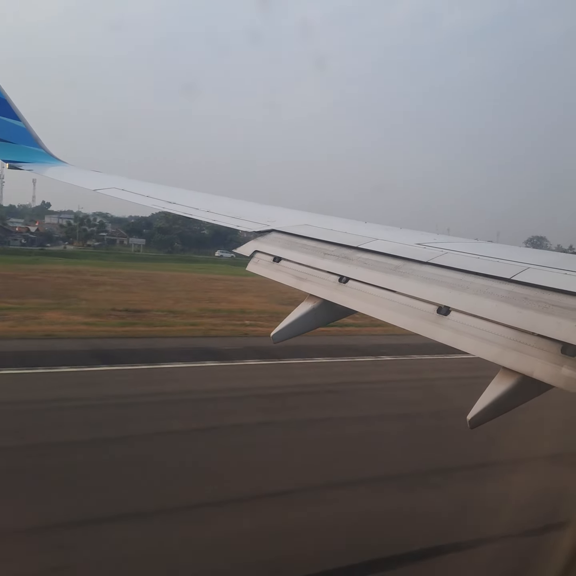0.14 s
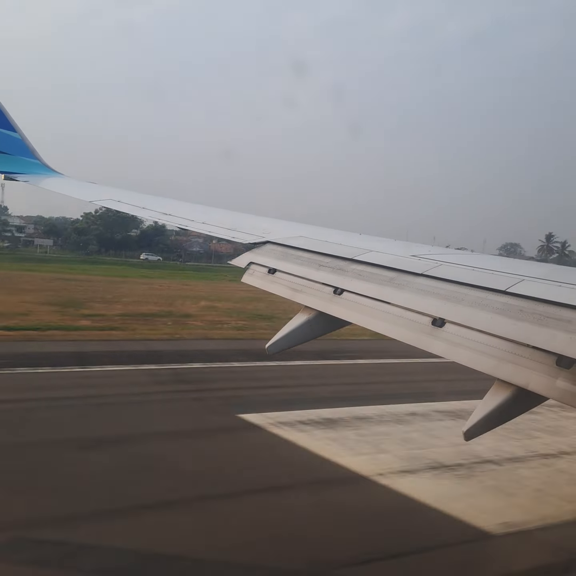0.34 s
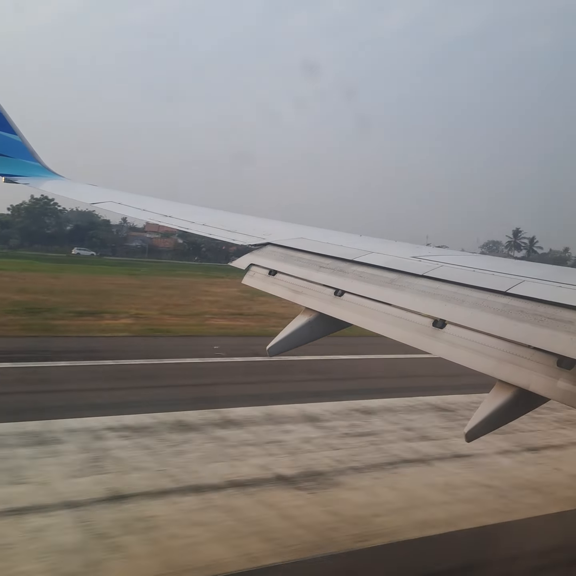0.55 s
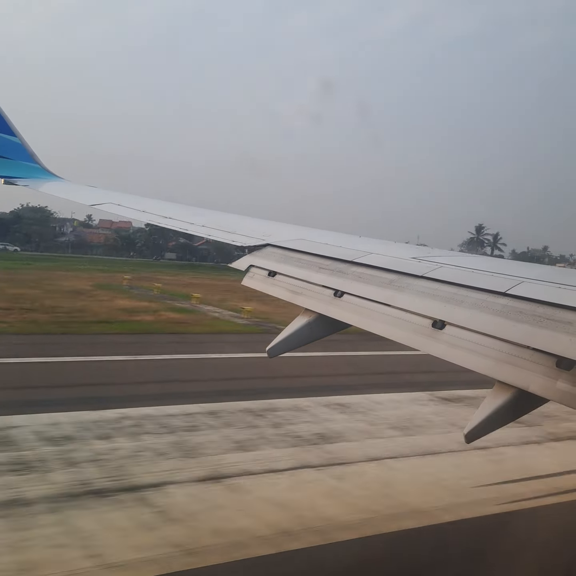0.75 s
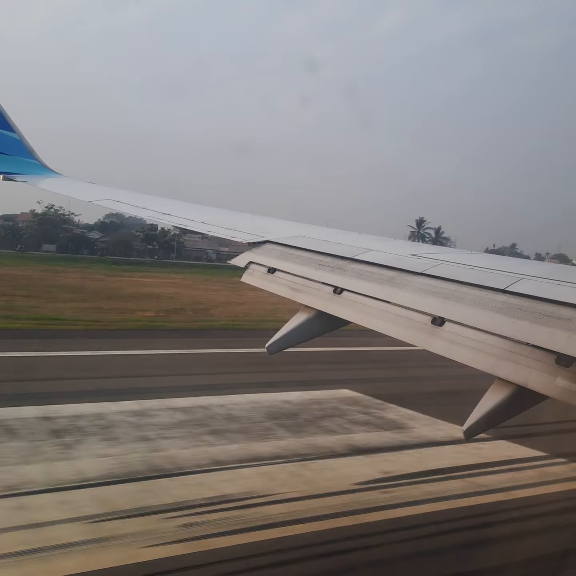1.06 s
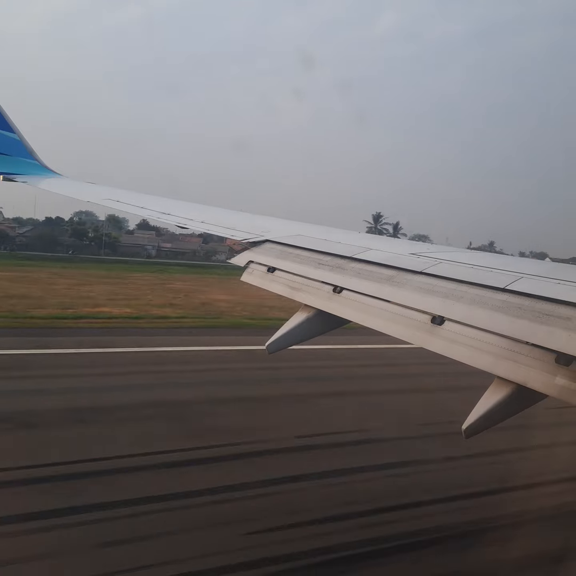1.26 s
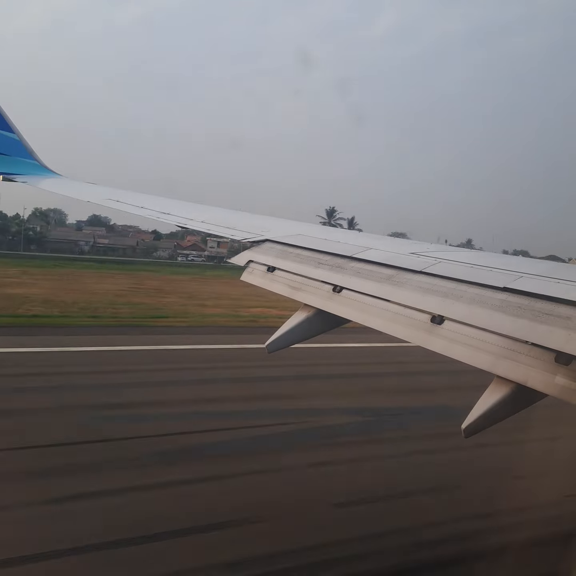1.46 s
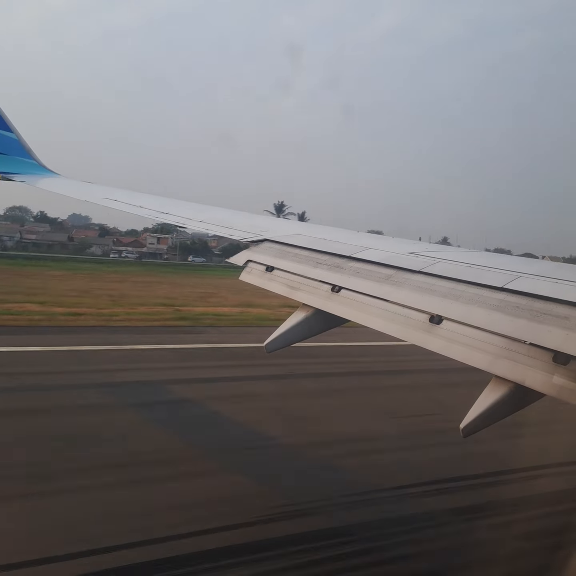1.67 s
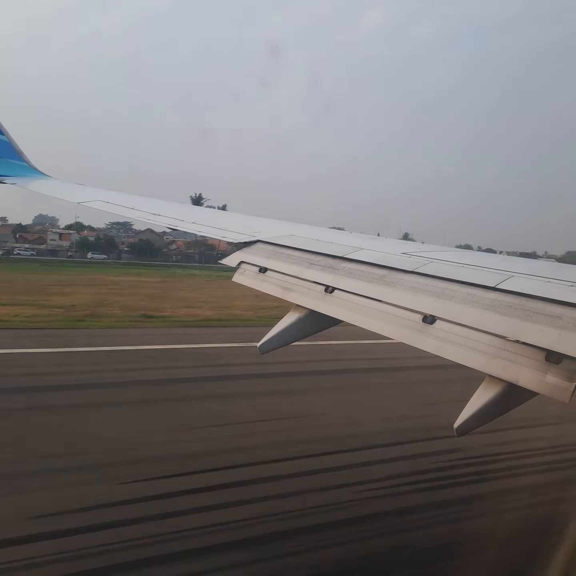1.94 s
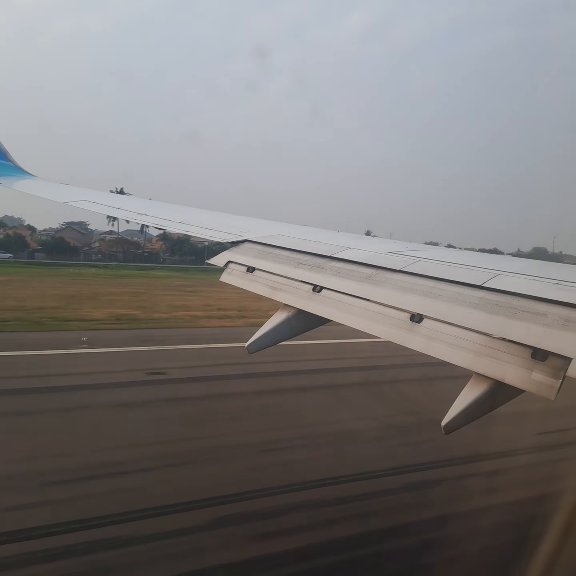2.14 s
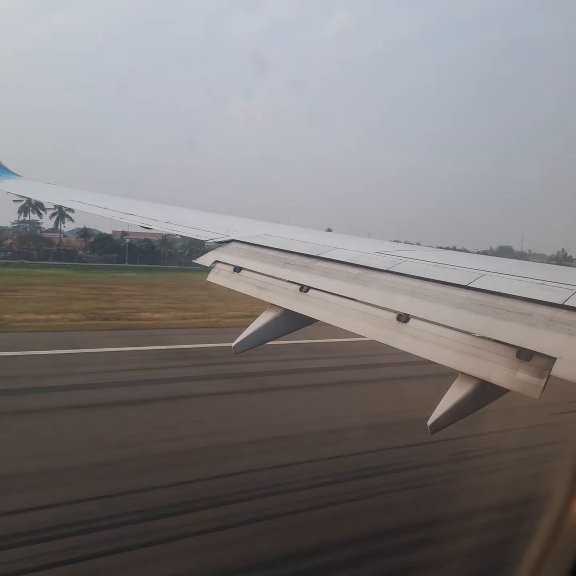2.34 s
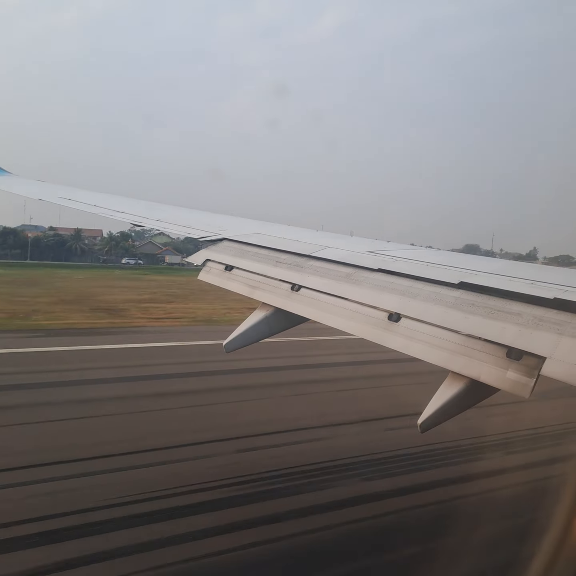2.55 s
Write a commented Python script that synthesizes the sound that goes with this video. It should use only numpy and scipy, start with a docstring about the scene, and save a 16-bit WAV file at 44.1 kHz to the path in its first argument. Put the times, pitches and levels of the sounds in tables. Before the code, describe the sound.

Deep cabin rumble of an airliner rolling fast on a runway, fittings knocking lightly.

```python
"""Window seat on the runway

An airliner rolls fast along a runway, heard from inside. The wheels shake the fuselage into a deep
boom and rumble; air and engines roar behind the wall, with a narrow fan whine near 2 kHz.
Cabin fittings knock a few times, and plastic trim ticks, chatters and faintly squeaks."""
import sys
import numpy as np
from scipy import signal
from scipy.fft import rfft, irfft
from scipy.io import wavfile
from scipy.ndimage import uniform_filter1d, map_coordinates

SR = 44100
rng = np.random.default_rng(int(sys.argv[2]) if len(sys.argv) > 2 else 0)


def file_out(sig):
    """Save sig as 16-bit WAV at sys.argv[1]."""
    # one column per channel
    cols = np.atleast_2d(sig).T
    # limit, then scale
    lim = np.clip(cols, -1, 1)
    pcm = np.round(lim * 32767).astype(np.int16)
    wavfile.write(sys.argv[1], SR, pcm)


N = 119070
T = np.arange(N) / SR
FREQS = np.maximum(np.arange(N // 2 + 1) * SR / N, 1)

# squeaks of rubbing trim (time [s], length [s], pitch [Hz], level [dB])
SQUEAKS = [(.28, .045, 2310, -51), (1.665, .065, 12550, -70), (2.612, .026, 7650, -67)]
# spells of chattering trim (time [s], length [s], level [dB], tilt [dB/octave])
CHATTER_SPELLS = [(0.005, 0.11, -55.5, 4), (0.17, .16, -62, 13.5), (2.313, 0.093, -54.5, -2.5),
                  (2.382, 0.14, -55, -1), (2.485, 0.1, -55.5, 3)]
# tone of the chatter (frequency [Hz], relative level [dB])
CHATTER_EQ = [(1000, -2.5), (3000, 17.5), (7000, 2), (9000, -1), (12000, -5), (15500, -16)]
# ticks of plastic trim (time [s], level [dB], left minus right [dB], tilt [dB/octave],
# ring pitch [Hz], ring against snap [dB], decay T60 [s])
TICKS = [ (.0445, -44.5, -4, 3, 4500, -9, .011), (.0875, -48.5, 1, -6, 7400, -7, .010),
         (.2125, -43, -5, 3, 5600, -8, .009), (.244, -50, -6, 7, 12000, -11.5, .009),
         (1.066, -51, 7, -3, 7200, -8, .012), (1.412, -49, 0, -7, 3300, -3, .012),
         (1.7835, -47, -5, 4, 3250, 4.5, .010), (1.847, -56, 1, 6, 12000, -9, .012),
         (2.222, -49, -3, -2, 7400, -9, .014), (2.344, -46, -2, -4, 4000, -6, .05),
         (2.401, -53, 3, 9, 12000, -6, .03), (2.466, -47, -3, -7, 3800, -3, .02),
         (2.472, -44, -4, -5, 3800, -3, .018), (2.506, -48.5, -2, 1, 14500, -12, .028),
         (2.551, -46.5, -1, -1.5, 11300, -9, .02), (2.5565, -47, -1, -2, 7800, -8, .012),
         (2.561, -50, -1, 2, 11200, -2, .02), (2.635, -55, 6, 4, 10000, -8, .012)]
# tone of a tick's snap (frequency [Hz], relative level [dB])
SNAP_EQ = [(1500, -17.5), (3000, 1), (4200, 3), (5600, -5), (7500, 0), (8800, -9), (11500, -5),
           (15500, -10)]
# knocks of cabin fittings (time [s], level [dB], body left minus right [dB], crack gain [dB],
# body tilt [dB/octave])
KNOCKS = [ (1.417, -34.5, -2, -22, -7), (1.490, -33, -2, -28, -2), (1.911, -27.5, -8.5, -3, 2.5),
          (1.926, -37, 0, -14, 1.5), (1.944, -39, -8, -14, -9), (1.959, -35.5, -8, -19, -0.5),
          (1.974, -38.5, -9, -20, 3), (2.331, -32, -10, -24, 0.5), (2.547, -31, -7, -19, -8.5)]
# hollow body of a knock (frequency [Hz], width [Hz], relative level [dB])
PANEL_MODES = [(556, 100, 3.5), (730, 280, 4.5), (870, 250, 3.5), (1290, 340, -0.5), (1480, 220, -3.5),
               (2280, 410, -14), (3450, 400, -18.5)]
# tone of a knock's crack (frequency [Hz], relative level [dB])
CRACK_EQ = [(1200, -1.5), (2400, 5), (3300, 3), (4500, -5.5), (5600, -1), (7200, -8.5), (8500, -26),
            (15000, -30)]
# fader of the fan whine (time [s], level [dB])
FAN_LEVEL = [(0, -50.5), (.3, -54.5), (.37, -48), (.44, -55.5), (.62, -53), (.85, -52.5), (1.15, -51.5),
             (1.8, -52.5), (1.89, -50), (2.05, -55.5), (2.3, -48.5), (2.37, -52), (2.43, -50.5),
             (2.7, -54.5)]
# higher whines of the compressor (pitch [Hz], width [Hz], level [dB], left minus right [dB])
COMPRESSOR_BANDS = [(2498, 80, -63, -3), (3303, 220, -67.5, 5.5), (3844, 130, -68, -3.5)]
# fader of the air whistle (time [s], level [dB])
WHISTLE_LEVEL = [(0, -88), (1.45, -83.5), (1.75, -78.5), (2.35, -80.5), (2.7, -85)]
# tone of air and engines through the wall (frequency [Hz], relative level [dB])
ROAR_EQ = [(200, -2.5), (380, 0), (490, -2), (590, 3), (720, -3), (950, -4), (1350, -5.5), (1750, -10.5),
           (2200, -11), (2600, -17), (2950, -18.5), (4200, -27.5), (5200, -27), (6000, -34), (7400, -31.5),
           (8200, -37.5), (15500, -37)]
# stereo balance of the roar (frequency [Hz], left minus right [dB])
ROAR_BALANCE = [(200, -2), (390, 5.5), (500, -5.5), (580, -7.5), (800, -1), (1050, -7.5), (1400, -5.5),
                (1750, -8), (2100, 4.5), (2800, -1.5), (7000, 2.5), (12000, -0.5)]
# how alike the roar is on both sides (frequency [Hz], likeness [0-1])
ROAR_LIKENESS = [(250, 1), (340, 0.02), (800, 0.6), (950, 0), (1350, 1), (1700, 1), (2400, 0.2),
                 (3000, 0.97), (8000, 0)]
# how early the roar reaches the left side (frequency [Hz], lead [s])
ROAR_LEAD = [(700, 0.0000798), (1100, 0.000475)]
# fader ride on the roar (time [s], gain [dB])
ROAR_RIDE = [(0, 1.5), (.9, -0.5), (1.4, 1.5), (1.85, 2), (2.1, 2.5), (2.7, 3.5)]
# higher cabin resonances (frequency [Hz], width [Hz], relative level [dB])
RUMBLE_MODES = [(98, 18, 2), (150.2, 28, -4.5), (188.3, 16.2, -3), (211.6, 12.6, -6), (242.7, 44, -10),
                (292, 69, -17), (373, 61, -23)]
# stereo balance of the rumble (frequency [Hz], left minus right [dB])
RUMBLE_BALANCE = [(100, -0.5), (230, 0.5), (370, 3.0)]
# how alike the rumble is on both sides (frequency [Hz], likeness [0-1])
RUMBLE_LIKENESS = [(100, 0.91), (220, 1.0), (290, 0.73), (350, 0.36)]
# fader of the rumble (time [s], level [dB])
RUMBLE_LEVEL = [(0, -18.5), (.38, -20), (.5, -19), (1.0, -18.5), (1.5, -18.5), (1.6, -16.5), (1.82, -17.5),
                (1.93, -19.5), (2.04, -17.5), (2.7, -18.5)]
# fuselage resonances driven by the wheels (frequency [Hz], width [Hz], relative level [dB])
BOOM_MODES = [(43.6, 17, -2.5), (48, 4.8, 1.5), (61, 9.8, 2)]
# low cut on the boom (frequency [Hz], gain [dB])
BOOM_LOW_CUT = [(24, -13.5), (33, -10), (40, -0.5)]
# fader of the deep boom: uneven swells and dips, with a few thumps (time [s], level [dB])
BOOM_LEVEL = [(0, -15), (.15, -16), (.21, -22.5), (.28, -7.5), (.38, -14.5), (.44, -19.5), (.57, -19),
              (.63, -14.5), (.8, -16.5), (.92, -15.5), (1.2, -19), (1.4, -14), (1.55, -23), (1.66, -18.5),
              (1.76, -18), (1.85, -13.5), (2.0, -19), (2.14, -16.5), (2.28, -12), (2.37, -23),
              (2.45, -16.5), (2.66, -13)]


def amp(db):
    """Decibels to gain."""
    return 10 ** (np.asarray(db) / 20)


def unit(x):
    """Scale to rms 1."""
    return x / np.sqrt(np.mean(x ** 2))


def over_freq(points):
    """Join (Hz, value) points on a log axis."""
    hz, values = np.array(points).T
    return np.interp(np.log(FREQS), np.log(hz), values)


def fader(points):
    """Gain over time from (s, dB) points."""
    return amp(np.interp(T, *np.array(points).T))


def eq(points, tilt_db=0):
    """Gain over frequency from (Hz, dB) points, tilted by some dB per octave."""
    return amp(over_freq(points) + tilt_db * np.log2(FREQS))


def resonances(modes):
    """Gain of a set of steep-sided resonances."""
    return np.sqrt(sum(amp(db) ** 2 / (1 + ((FREQS - hz * hz / FREQS) / (1.55 * width)) ** 2) ** 2
                       for hz, width, db in modes))


def pan(db):
    """Left and right gains for a level difference."""
    gains = amp(np.array([[1], [-1]]) * db / 2)
    return gains / np.sqrt(np.mean(gains ** 2, axis=0))


def noise(gain, likeness=0, lead_rad=0):
    """Coloured stereo noise at rms 1, partly alike on both sides, the left ahead by a phase."""
    mid, side = rfft(rng.standard_normal((2, N)))
    sign = np.array([[1], [-1]])
    stereo = np.sqrt(1 + likeness) * mid + sign * np.sqrt(1 - likeness) * side
    return unit(irfft(gain * stereo * np.exp(1j * sign * lead_rad / 2), N))


def band(hz, width_hz, likeness, lead_rad=0):
    """A breathy note: noise through one resonance."""
    return noise(resonances([(hz, width_hz, 0)]), likeness, lead_rad)


def wander(hz):
    """Slow random movement with a spread of about 1."""
    return noise(1 / (1 + (FREQS / hz) ** 4))[0]


def steady(x, share):
    """Even out part of the random swells of a vibration."""
    power = uniform_filter1d(np.mean(np.abs(signal.hilbert(x)) ** 2, axis=0), size=2600)
    return unit(x / power ** (share / 2))


def swell(start, length):
    """A half-sine rise and fall."""
    return np.sin(np.pi * np.clip((T - start) / length, 0, 1))


def strike(start, attack_s, t60):
    """A fast rise and decay, followed by the cabin's short tail."""
    age = np.maximum(T - start, 0)
    direct = amp(-60 * age / t60)
    tail = amp(-1.5 - 60 * age / (2.381 * t60))
    return (1 - np.exp(-age / attack_s)) * np.hypot(direct, tail)


def squeaks():
    """Trim rubs briefly on one thin note."""
    return sum(band(hz, width_hz=95, likeness=0.79) * swell(start, length) * amp(db)
               for start, length, hz, db in SQUEAKS)


def chatter(contacts_per_s=750, grain_s=0.0018):
    """Dense tiny contacts of shaking trim swell and die away."""
    out = 0
    for start, length, db, tilt_db in CHATTER_SPELLS:
        contacts = (rng.random(N) < contacts_per_s / SR) * rng.standard_normal((2, N))
        energy = signal.lfilter([1], [1, -np.exp(-1 / (grain_s * SR))], contacts ** 2)
        grains = np.sqrt(energy) * rng.standard_normal((2, N))
        rattle = unit(irfft(rfft(grains) * eq(CHATTER_EQ, tilt_db), N))
        out += rattle * swell(start, length) * amp(db)
    return out


def ticks():
    """Trim panels slip against each other with single dry ticks, each with its own brief ring."""
    out = 0
    for start, db, side_db, tilt_db, ring_hz, ring_db, t60 in TICKS:
        snap = noise(eq(SNAP_EQ, tilt_db), likeness=0.74)
        ring = band(ring_hz, 0.24 * ring_hz, likeness=1) * amp(ring_db)
        out += (snap + ring) * strike(start, 0.000043, t60) * amp(db) * pan(side_db)
    return out


def knocks():
    """Cabin fittings knock: a sharp crack, then the hollow ring of a panel."""
    out = 0
    for start, db, side_db, crack_db, tilt_db in KNOCKS:
        body = noise(resonances(PANEL_MODES) * amp(tilt_db * np.log2(FREQS)), likeness=0.48)
        body *= strike(start + 0.00053, attack_s=0.0018, t60=0.042)
        crack = noise(eq(CRACK_EQ), likeness=0.29)
        crack *= strike(start - 0.001, attack_s=0.00063, t60=0.0078)
        out += amp(db) * (1.33 * body * pan(side_db) + amp(crack_db) * crack * pan(1.7))
    return out


def whistle():
    """Air whistles thinly at the very top."""
    return band(hz=12750, width_hz=200, likeness=0.5) * fader(WHISTLE_LEVEL)


def whine(waver_share=0.007, swell_db=2):
    """Narrow bands from the engine's blades waver together in pitch and swell on their own."""
    fan = band(hz=2053, width_hz=61, likeness=0.71, lead_rad=0.35) * fader(FAN_LEVEL) * pan(2.5)
    compressor = 0
    for hz, width, db, side_db in COMPRESSOR_BANDS:
        note = band(hz, width, likeness=0.71, lead_rad=0.62)
        compressor += note * amp(db + swell_db * wander(hz=4)) * pan(side_db)
    drift = wander(hz=4)
    playhead = np.cumsum(1 + waver_share * (drift - drift.mean()))  # varispeed bends the pitch
    return np.array([map_coordinates(side, [playhead], mode="mirror") for side in fan + compressor])


def roar():
    """Air and jet noise through the wall, with a hollow note; the treble reaches the left first."""
    lead_rad = 2 * np.pi * FREQS * over_freq(ROAR_LEAD)
    rush = noise(eq(ROAR_EQ) * pan(over_freq(ROAR_BALANCE)), over_freq(ROAR_LIKENESS), lead_rad)
    hollow_note = band(hz=797, width_hz=40, likeness=0.42)
    return rush * amp(-40.5) * fader(ROAR_RIDE) + hollow_note * amp(-53.5)


def wheels():
    """The wheels shake the fuselage: deep boom, rumble of higher resonances and a sub-bass sway."""
    boom = noise(resonances(BOOM_MODES) * eq(BOOM_LOW_CUT), likeness=1)
    boom = steady(boom, share=0.7) * fader(BOOM_LEVEL)
    rumble_tone = resonances(RUMBLE_MODES) * pan(over_freq(RUMBLE_BALANCE))
    rumble = noise(rumble_tone, over_freq(RUMBLE_LIKENESS), lead_rad=-0.19)
    rumble = steady(rumble, share=0.41) * fader(RUMBLE_LEVEL)
    sway = band(hz=22.8, width_hz=4.7, likeness=0.99) * amp(-47)
    return boom + rumble + sway


def scene():
    """The full mix at the seat."""
    return wheels() + roar() + whine() + whistle() + knocks() + ticks() + chatter() + squeaks()


def record(dry, fade_s=0.004, top_hz=15800):
    """Quick fades at both ends and a steep high cut."""
    to_edge = np.minimum(T, T[-1] - T)
    fade = np.sin(np.pi / 2 * np.minimum(to_edge / fade_s, 1)) ** 2
    high_cut = signal.ellip(10, 0.1, 80, top_hz, fs=SR, output="sos")
    return signal.sosfilt(high_cut, dry * fade)


dry = scene()
out = record(dry)
file_out(out)
```